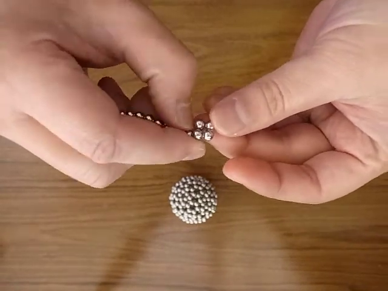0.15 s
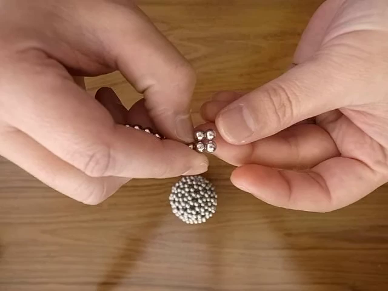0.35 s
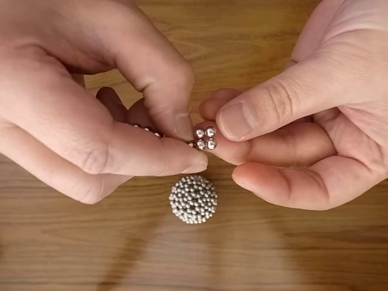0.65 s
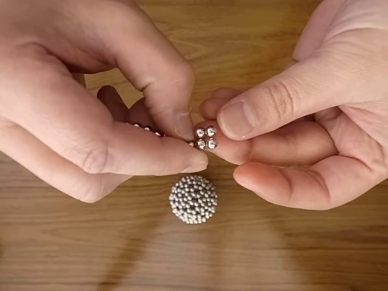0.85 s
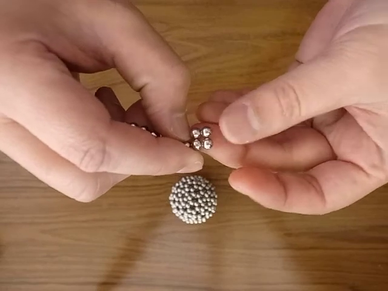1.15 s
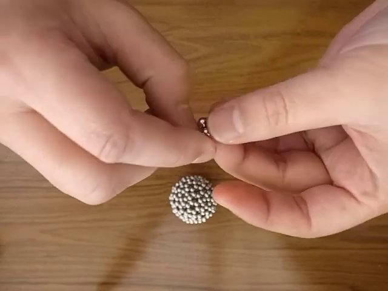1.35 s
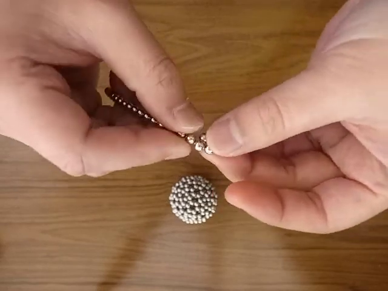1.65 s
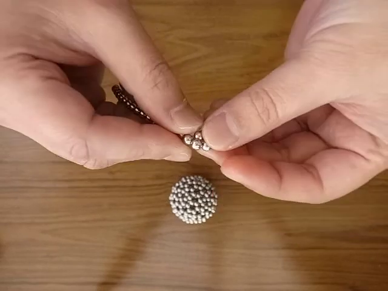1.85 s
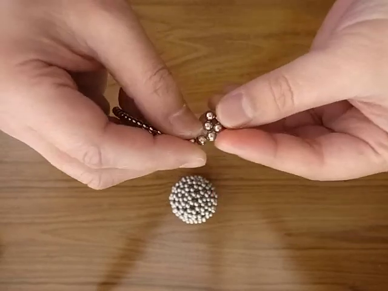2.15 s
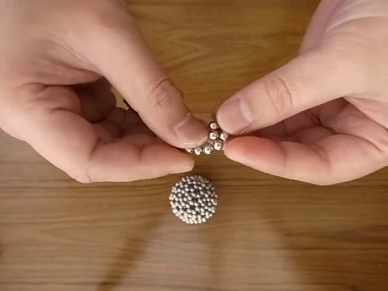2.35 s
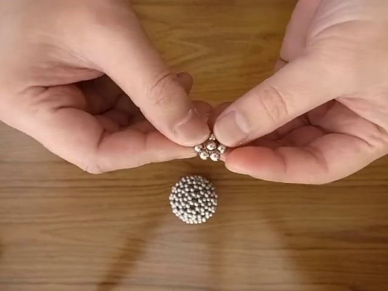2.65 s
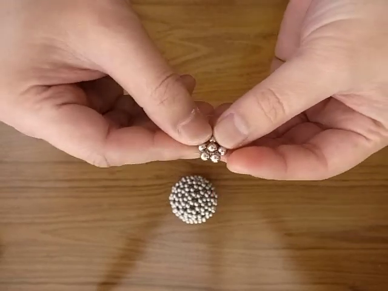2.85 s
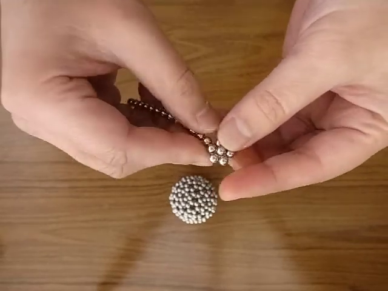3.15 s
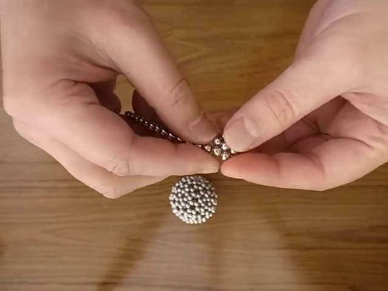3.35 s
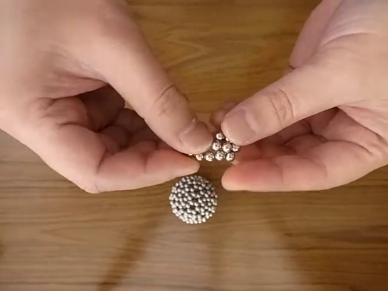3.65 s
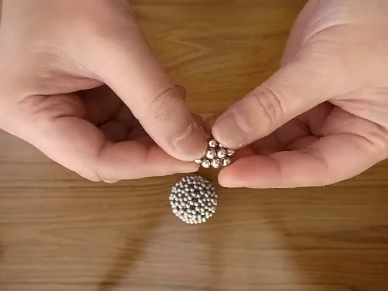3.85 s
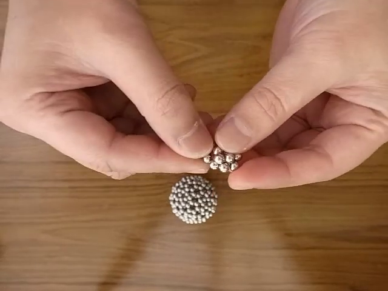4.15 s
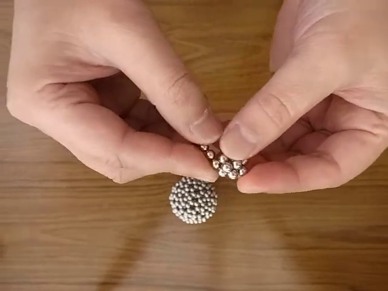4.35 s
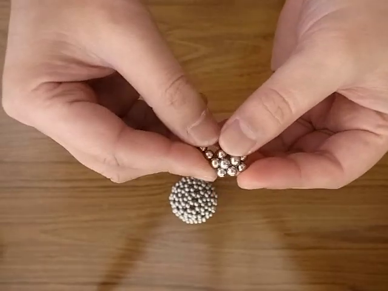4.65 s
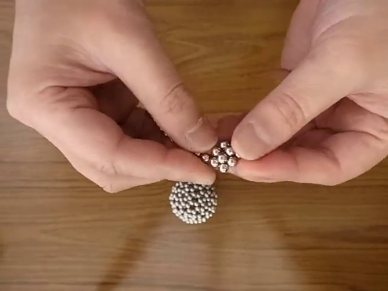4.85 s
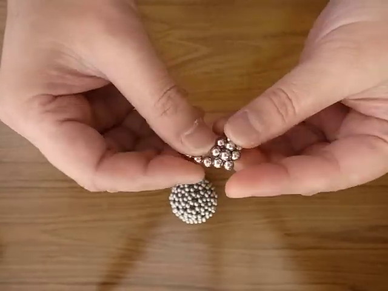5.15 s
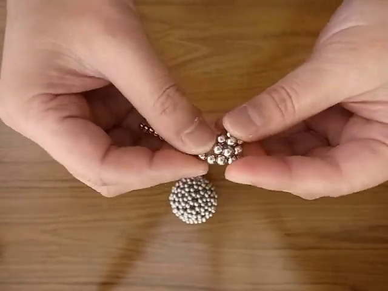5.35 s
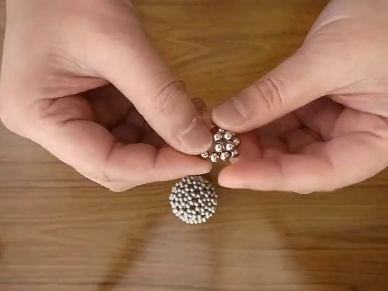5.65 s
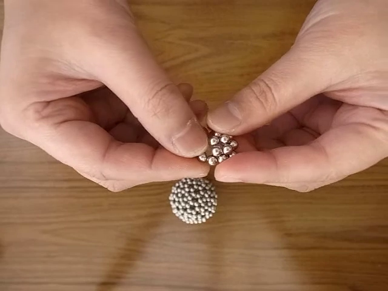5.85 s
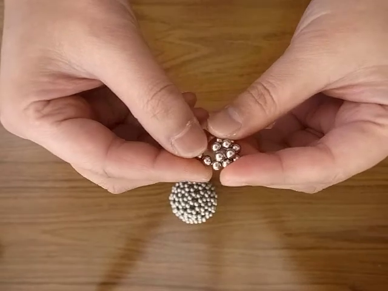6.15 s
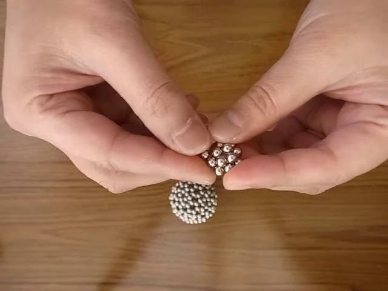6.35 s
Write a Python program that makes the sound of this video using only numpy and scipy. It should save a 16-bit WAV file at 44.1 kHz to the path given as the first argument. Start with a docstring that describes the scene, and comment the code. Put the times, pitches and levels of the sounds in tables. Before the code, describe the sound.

Near-silence with soft hiss, then dry high-pitched metallic snaps as magnetic beads jump together between fingertips. A medium click and a softer one lead to a quick cluster of three, then barely audible ticks, a hard snap, a long pause and a final, very sharp double contact heard as one. Small quiet room, close microphone, the same sound in both channels, faint electronic whine.

```python
"""Small steel magnet balls snap together between fingertips above a wooden table, heard from close by.
Each snap is a millisecond click of ringing air pockets, echoed by the table top and trailed by a short
bright room tail of dying noise. Beneath lie the camera's hiss (coloured noise), thin electronic whines
and mains hum (sines), and a once-a-second whisper (a gated narrow band of noise)."""
import sys
import numpy as np
from scipy import signal
from scipy.fft import rfft, irfft, next_fast_len
from scipy.io import wavfile
from scipy.ndimage import uniform_filter1d

SR = 44100
rng = np.random.default_rng(int(sys.argv[2]) if len(sys.argv) > 2 else 0)


def unload_wav(signal):
    """Save mono or channel-first audio to the path in sys.argv[1] as 16-bit WAV at rate SR, clipped to [-1, 1]."""
    wavfile.write(
        sys.argv[1],
        SR,
        np.round(np.clip(np.atleast_2d(signal).T, -1, 1) * 32767).astype(np.int16),
    )


def gain_from_db(level_db):
    """Convert decibel levels to linear amplitude factors (20 dB per decade)."""
    decades = np.asarray(level_db, float) / 20
    return 10 ** decades


N = 287091


def rms_one(x):
    """Scales a signal to an rms of 1."""
    return x / np.sqrt(np.mean(x ** 2) + 1e-20)


def at_hz(hz_points, db_points, hz):
    """Reads a level curve, drawn over log frequency, at the given frequencies."""
    return np.interp(np.log(hz), np.log(hz_points), db_points)


def tones():
    """Clean sines: mains hum below, whines of the circuits above."""
    # steady hum and whines: (frequency [Hz], rms level [dB])
    steady_tones = [(59.5, -79), (120, -66), (339, -82), (7215, -86), (14430, -80), (14752, -82),
                    (15135, -83), (15600, -87), (15730, -83)]
    t = np.arange(N) / SR
    total = np.zeros(N)
    for hz, db in steady_tones:
        start_phase = rng.random()
        total += np.sqrt(2) * gain_from_db(db) * np.sin(2 * np.pi * (hz * t + start_phase))
    return total


def whisper():
    """A narrow band of electronic noise that switches on briefly about once a second."""
    first_s, period_s, length_s = 0.17, 1.001, 0.2
    centre_hz, width_hz, level_db = 10400, 700, -71   # rms while on
    edges_hz = [centre_hz - width_hz / 2, centre_hz + width_hz / 2]
    band = signal.butter(2, edges_hz, "band", fs=SR, output="sos")
    is_on = (np.arange(N) / SR - first_s) % period_s < length_s
    gate = uniform_filter1d(1. * is_on, size=600)
    return gain_from_db(level_db) * gate * rms_one(signal.sosfilt(band, rng.standard_normal(N)))


def hiss():
    """Steady camera noise, coloured in the spectrum, with a slight regular ripple over frequency."""
    # colour of the hiss: (frequency [Hz], relative level per Hz [dB])
    hiss_colour = [(20, -13.5), (55, -5.5), (90, -12), (170, -11.5), (330, -14), (600, -14), (1000, -17.5),
                   (1640, -20), (2400, -19.5), (3400, -21), (5000, -22), (14900, -23), (15300, -27),
                   (17000, -30)]
    level_db = -56.5   # rms
    ripple_hz, ripple_db = 1490, 0.7   # spacing and height of the ripple
    size = next_fast_len(N)
    hz = np.maximum(np.fft.rfftfreq(size, 1 / SR), 1)
    colour_db = at_hz(*np.transpose(hiss_colour), hz)
    colour_db = colour_db + ripple_db * np.cos(2 * np.pi * hz / ripple_hz)
    noise = irfft(rfft(rng.standard_normal(size)) * gain_from_db(colour_db), size)
    return gain_from_db(level_db) * rms_one(noise[:N])


def dying_noise(t60, start_s):
    """Reflections: noise that starts late, arrives in uneven bunches and dies away; energy 1."""
    lumps_db = 2.5   # rms unevenness of bunches a few ms long
    t = np.arange(int(.25 * SR)) / SR
    fade_in = np.clip((t - start_s) * 2000, 0, 1)   # half a millisecond
    tail = rng.standard_normal(len(t)) * gain_from_db(-60 * t / t60) * fade_in
    lumps = rms_one(uniform_filter1d(rng.standard_normal(len(t)), size=90))
    tail = tail * gain_from_db(lumps_db * lumps)
    return tail / np.sqrt(np.sum(tail ** 2))


def room_walls(open_db):
    """Nearby things answer before the walls; the tail is bright, with extra sheen in one high band."""
    desk = gain_from_db(-16) * dying_noise(t60=0.063, start_s=0.0013)
    room = gain_from_db(-19) * dying_noise(t60=0.29, start_s=0.004)
    bright = signal.butter(1, 5000, "high", fs=SR, output="sos")
    sheen = signal.butter(1, (14600, 15700), "band", fs=SR, output="sos")
    walls = gain_from_db(open_db) * signal.sosfilt(bright, desk + room)
    return walls + signal.sosfilt(sheen, walls)


def snap(peak_db, pitch, knock_hz, knock_db, pockets_db, late_s):
    """A contact rings air pockets, the hollow of the hand (knock) and the fingertips, coloured by the grip.
    Returns the whole click and its first touch alone."""
    # air pockets between cluster and cupped fingers, before pitch and grip:
    # (frequency [Hz], level [dB], decay time t60 [s])
    air_pockets = [(5050, 0, .0025), (5900, 0, .0025), (6800, 0, .0035), (7900, -1, .003), (9000, 0, .003),
                   (10300, 0, .003), (11500, -1, .003), (12800, 0, .0035), (13700, 1, .003),
                   (14600, 1, .003), (15500, 1, .0025), (16250, -6, .003)]
    # where the colour of the grip is set: (frequency [Hz])
    grip_hz = [5050, 5900, 6800, 7900, 9300, 11400, 13400, 15400]
    t = np.maximum(np.arange(600) / SR - late_s, 0)

    # levels relative to 13.4 kHz; near 15.4 kHz harder snaps carry relatively more
    top_db = -3 + 0.24 * peak_db
    colour_db = [*pockets_db, 0, top_db]
    gripped = [(pitch * hz, db + at_hz(grip_hz, colour_db, hz), t60) for hz, db, t60 in air_pockets]
    knock = (knock_hz, knock_db, 0.0037)
    push_db = -20.5 + 2.2 * peak_db   # the jolt of the fingertips grows faster than the snap
    push = (2000, push_db, 0.002)
    hz, db, t60 = np.transpose([push, knock, *gripped])[:, :, None]
    hz = hz * (1 + .006 * rng.standard_normal(hz.shape))

    sign = (-1.) ** np.arange(len(hz))[:, None]   # neighbours swing in opposition: no holes between them
    rings = sign * gain_from_db(db - 60 * t / t60) * np.sin(2 * np.pi * hz * t)
    rings = rings * (1 - np.exp(-t / 0.00015))   # the air follows the contact within a cycle or two
    first_touch = rings.sum(axis=0)

    # the ball meets a second neighbour just after the first; only the pockets answer
    settle_s = rng.uniform(.00027, .0004)
    second_touch = np.roll(rings[2:].sum(axis=0), int(settle_s * SR))
    click = first_touch + gain_from_db(-7) * second_touch
    return gain_from_db(peak_db) * np.array([click, first_touch]) / np.abs(click).max()


def magnets():
    """Every snap, its echo from the table, scatter among the fingers and the room tail."""
    # snaps: (time [s], peak of the direct click [dB], reflections let through by the hands [dB],
    # table echo [dB], pitch of the pockets [factor], knock [Hz], then relative to 13.4 kHz:
    # knock [dB], grip colour near 5, 5.9, 6.8, 7.9, 9.3 and 11.4 kHz [dB each])
    snap_events = [(1.636, -10.5, 0, -17, 0.99, 3470, -28, -37, -12.5, -14, -17, -10, -10),
                   (2.0366, -22.5, 2, -11, .98, 3900, -23, -30, -22, -14, -31, -27, -6),
                   (2.6737, -15.5, -1, -11, .99, 3940, -4.5, -3, -6, -4, 7, 6, 0),
                   (2.8878, -10, -1.5, -19, .97, 3980, -15, -18, -18, -8, -18, -5, -12),
                   (2.9320, -5.5, -4.5, -22, 1.035, 3700, -34, -24, -27, -19, -17, -13, -8.5),
                   (3.1259, -43.5, 0, -15, 1., 2150, 5, -11, -10, -10, -11, -9, -6),
                   (4.0541, -33, 0, -18, .98, 4000, -13, -11, -12, -12, -2, -3, -1),
                   (4.3778, -39, 0, -15, .98, 4000, -15, -14, -13, -10, -1, -1, -1),
                   (4.4604, -2.5, 1, -9, 0.99, 3690, -17.5, -13, -15, -4.5, 0.5, -3, -1.5),
                   (6.3773, -11, -2, -19, 1., 4500, -20, -20, -13, -13, -10, -14, -8),
                   (6.3794, -1, -0.5, -15, .99, 4500, -20.5, -17.5, -15, -14.5, -9, 0.5, -6)]
    table_echo_s, hands_db, hands_t60_s = 0.00145, -13.5, 0.014
    out = np.zeros(N + SR)
    for time_s, peak_db, open_db, echo_db, pitch, knock_hz, knock_db, *pockets_db in snap_events:
        at = int(time_s * SR)
        late_s = time_s - at / SR   # the fraction of a sample left over
        click, first_touch = snap(peak_db, pitch, knock_hz, knock_db, pockets_db, late_s)
        paths = gain_from_db(hands_db + open_db) * dying_noise(hands_t60_s, start_s=0.00054)
        paths[0] += 1   # the direct sound
        paths[round(table_echo_s * SR)] += gain_from_db(echo_db)
        near = signal.fftconvolve(click, paths)
        # heard from all sides, the two touches blur into one
        far = signal.fftconvolve(first_touch, room_walls(open_db))
        heard = near + far
        out[at:at + len(heard)] += heard
    return out[:N]


def scene():
    """One microphone feeds both channels."""
    mono = tones() + whisper() + hiss() + magnets()
    return np.tile(mono, (2, 1))


def band_limit(x):
    """A steep low-pass at the top of the band."""
    return signal.sosfilt(signal.butter(12, 17170, fs=SR, output="sos"), x)


def record(dry):
    """A steep linear-phase treble cut; the topmost band passes only around sudden attacks."""
    cut_hz, cut_order = 16380, 100
    top_band_hz, top_opens_db = 15800, 9   # the quick rise of the treble that opens the band
    size = next_fast_len(N)
    hz = np.fft.rfftfreq(size, 1 / SR)
    spectrum = rfft(dry, size) / np.sqrt(1 + (hz / cut_hz) ** cut_order)

    # split into the topmost band and all below, crossing over within 120 Hz
    top_share = np.clip((hz - top_band_hz) / 120 + .5, 0, 1)
    below = irfft(spectrum * (1 - top_share), size)[:, :N]
    top = irfft(spectrum * top_share, size)[:, :N]

    # differencing favours the treble; its power now is set against the power just before
    power = np.diff(below, prepend=0) ** 2
    power_now = uniform_filter1d(power, size=64)
    power_before = uniform_filter1d(power, size=601, origin=300)
    rises = power_now > gain_from_db(2 * top_opens_db) * power_before
    is_open = uniform_filter1d(1. * rises, size=257) > .01   # stays open a little around each rise
    gate = uniform_filter1d(1. * is_open, size=64)
    mix = below + top * gate
    return band_limit(mix)


dry = scene()
out = record(dry)
unload_wav(out)
```